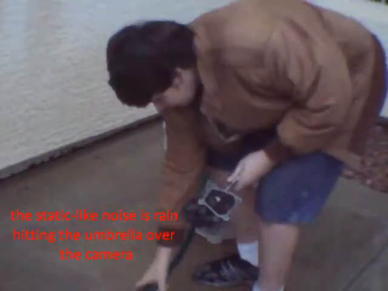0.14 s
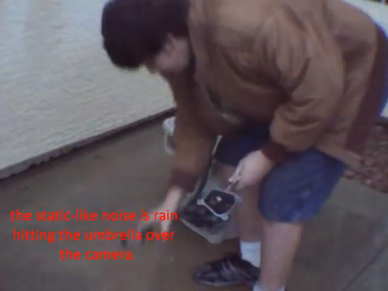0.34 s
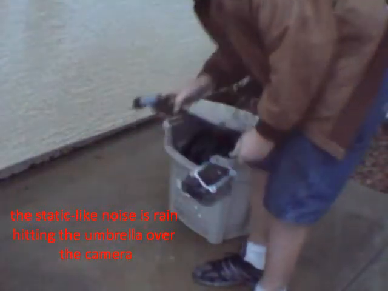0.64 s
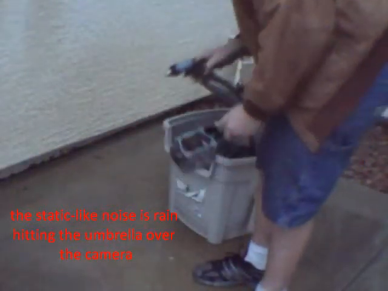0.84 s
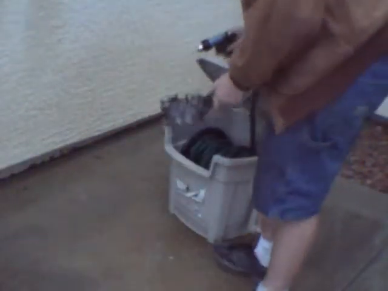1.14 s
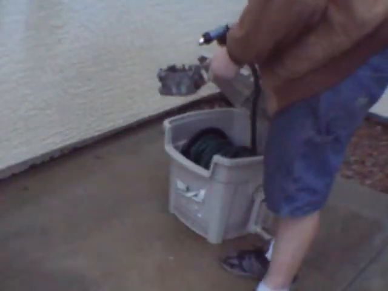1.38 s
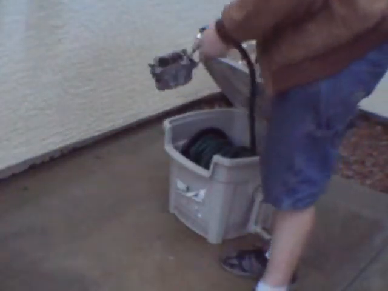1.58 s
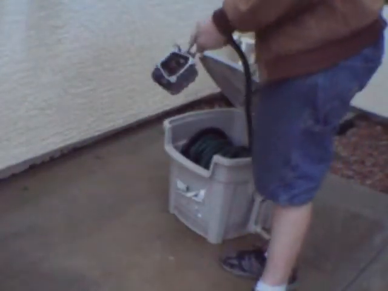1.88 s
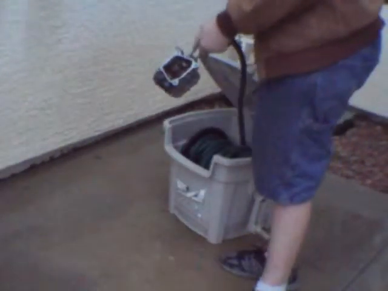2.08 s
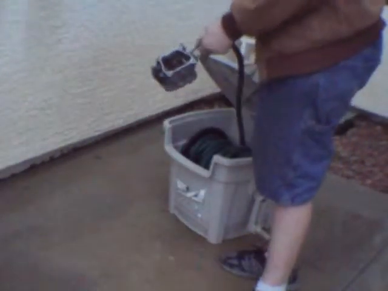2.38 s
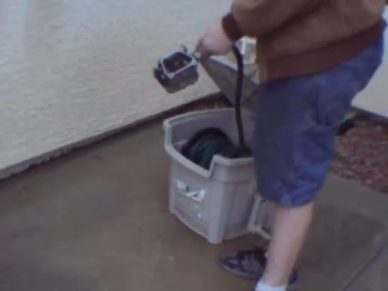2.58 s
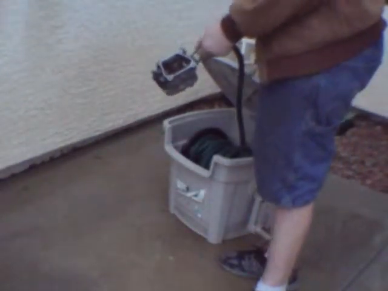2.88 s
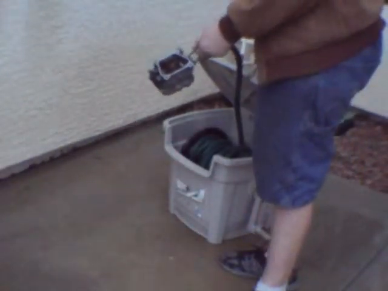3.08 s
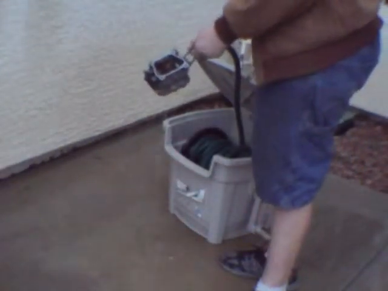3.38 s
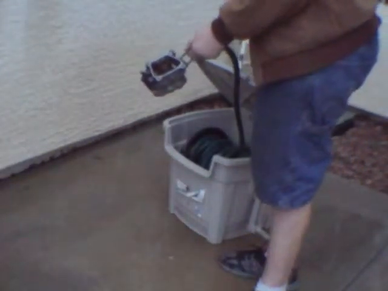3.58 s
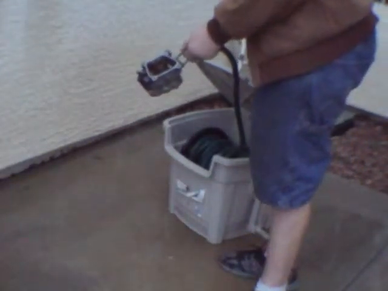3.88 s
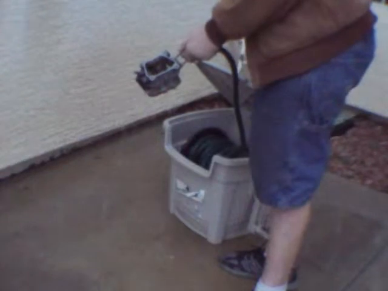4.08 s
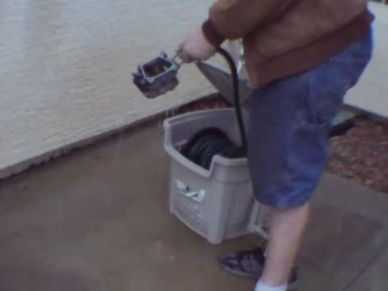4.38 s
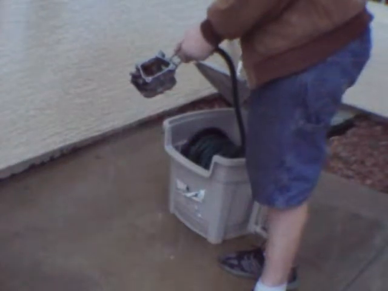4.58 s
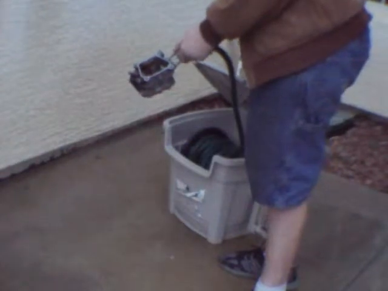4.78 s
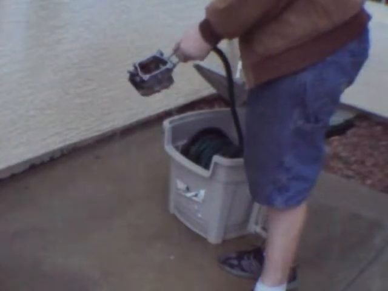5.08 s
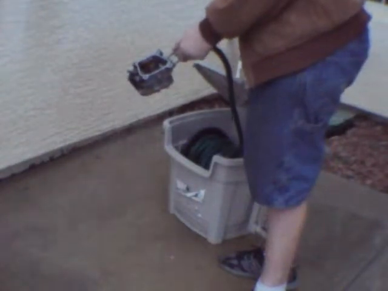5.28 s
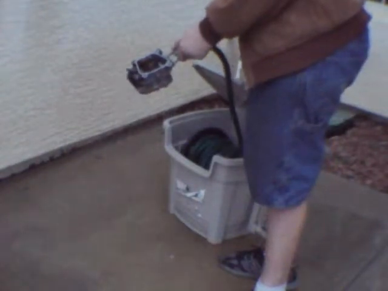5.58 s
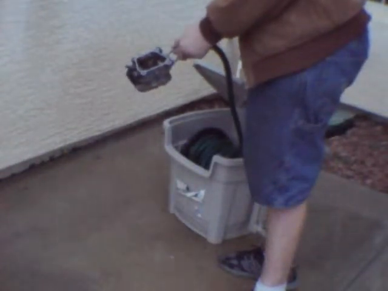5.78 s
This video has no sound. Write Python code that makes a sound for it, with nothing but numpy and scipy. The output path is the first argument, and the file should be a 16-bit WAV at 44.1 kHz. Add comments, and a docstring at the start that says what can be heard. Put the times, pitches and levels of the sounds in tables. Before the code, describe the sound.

Heavy rain drums rapidly on an umbrella right above the microphone, with brief plastic knocks and scraping early, then livelier water splashes.

```python
"""Heavy rain drums on a taut umbrella just above a small camera microphone: each drop rings damped cloth modes.
A hose fizzes and splashes as noise grains and bubbles; run-off from a rinsed metal part joins halfway.
Early on, things knock (struck modes) and scrape (banded grit) in a plastic hose bin; rain falls all around.
The cheap recorder whines faintly and sits far off zero, so its negative peaks clip."""
import sys
import numpy as np
from scipy import signal
from scipy.fft import rfft, irfft
from scipy.io import wavfile
from scipy.ndimage import uniform_filter1d

SR = 44100
rng = np.random.default_rng(int(sys.argv[2]) if len(sys.argv) > 2 else 0)


def int16_out(signal):
    """Quantize to a 16-bit WAV file."""
    q = np.round(np.clip(np.atleast_2d(signal).T, -1, 1) * 32767)
    wavfile.write(sys.argv[1], SR, q.astype(np.int16))


N = 261954


def undb(db):
    """Amplitude factor of a level in dB."""
    return 10 ** (np.asarray(db) / 20)


def level(x, rms_db):
    """Scale to an rms level."""
    return x * undb(rms_db) / np.sqrt(np.mean(x ** 2))


def decay(t, t60_s):
    """Exponential decay, 60 dB down at t60_s."""
    return np.exp(-np.log(1000) * t / t60_s)


def seconds(length_s):
    """Time axis of a grain."""
    return np.arange(int(length_s * SR)) / SR


def curve(table):
    """Amplitude over the scene from (time [s], level [dB])."""
    time_s, db = np.transpose(table)
    return undb(np.interp(np.arange(N) / SR, time_s, db))


def add(out, time_s, grains):
    """Mix one grain (row) in at each time."""
    at = (np.asarray(time_s) * SR).astype(int)[:, None] + np.arange(grains.shape[1])
    out += np.bincount(at.ravel(), grains.ravel(), N + SR)[:N]


def band(x, hz, width_hz):
    """Single resonance."""
    return signal.lfilter(*signal.iirpeak(hz, hz / width_hz, fs=SR), x)


def walk(rate_hz):
    """Random levels held 1 / rate_hz and slewed twice."""
    hold = int(SR / rate_hz)
    steps = np.repeat(rng.standard_normal(N // hold + 1), hold)
    return 1.08 * uniform_filter1d(uniform_filter1d(steps, hold), hold)[:N]


# steady tones: (frequency [Hz], rms level [dB])
WHINE_TONES = [(1000, -53), (7500, -63.5)]


def whine():
    """Two thin steady tones from the camera's electronics."""
    t = np.arange(N) / SR
    return sum(undb(db) * 2 ** .5 * np.sin(2 * np.pi * hz * t) for hz, db in WHINE_TONES)


# spectrum of the surrounding rain: (frequency [Hz], relative density [dB per Hz])
FAR_RAIN_SPECTRUM = [(25, -6.5), (60, -9), (130, -8), (300, -8), (600, -3.5), (1000, -2.5), (1300, -3),
                     (1860, -5.5), (2520, -11.5), (4000, -15), (7300, -20), (8400, -18)]
FAR_RAIN_RMS_DB = -40


def far_rain():
    """Rain on the ground around: bands half an octave apart swell together and flicker alone."""
    hz, db = np.transpose(FAR_RAIN_SPECTRUM)
    f = np.maximum(np.fft.rfftfreq(N, 1 / SR), 1)
    colour = undb(np.interp(np.log(f), np.log(hz), db))
    swell = walk(2)
    out = np.zeros(N)
    for centre_oct in np.arange(4.5, 13.6, .5):  # log2 of Hz
        share = np.clip(1 - 2 * np.abs(np.log2(f) - centre_oct), 0, 1) ** .5
        noise = irfft(rfft(rng.standard_normal(N)) * colour * share, N)
        out += undb(3.0 * swell + 0.84 * walk(25)) * noise
    return level(out, FAR_RAIN_RMS_DB)


# things dragged along the bin: (time [s], level [dB])
SCRAPE_LEVEL = [(.32, -58), (.35, -38), (.4, -36), (.46, -48), (.74, -48), (.8, -34), (.86, -40),
                (.95, -37.5), (1.05, -63)]


def scrape():
    """Uneven stick-slip grit, ringing the wall in a broad band."""
    time_s, db = np.transpose(SCRAPE_LEVEL)
    grit = rng.standard_normal(N) * undb(3.9 * walk(120))
    envelope = undb(np.interp(np.arange(N) / SR, time_s, db, -120, -120))
    return envelope * level(band(grit, 620, 700), 0)


# blows in the bin: (time [s], level [dB], pitch factor [1], nominal contact [s])
BIN_BLOWS = [(0.345, -30.5, 1.3, 0.0012), (0.356, -36, 1.02, .001), (0.374, -24, 0.69, 0.0028),
             (0.386, -41, 1.03, .001), (.405, -28.5, 0.85, 0.0022), (0.754, -28, 1.1, 0.0042),
             (0.793, -20.5, 1.02, 0.00092), (.801, -37, 1.14, 0.0007), (.808, -26, 1.04, 0.0013),
             (.814, -21.5, 1.014, 0.00068), (0.83, -33.5, 0.9, 0.00051), (0.846, -30, 0.81, .004),
             (.88, -29.5, 0.97, 0.0022), (.92, -37, 1.07, 0.00083)]
# wall modes before the pitch factor: (frequency [Hz], t60 [s], level [dB])
BIN_MODES = [(239, 0.12, -1.5), (356, 0.048, -6), (525, 0.06, -7), (676, 0.054, -14), (835, 0.05, -5),
             (986, 0.042, -2.5), (1306, 0.046, -2)]


def bin_knocks():
    """Blows on the plastic wall: a longer push leaves the upper modes quiet; loose parts rattle after."""
    out, t = np.zeros(N), seconds(.25)
    for time_s, db, pitch, contact_s in BIN_BLOWS:
        ring = sum(undb(mode_db) * np.sin(2 * np.pi * hz * pitch * t) * decay(t, t60_s)
                   for hz, t60_s, mode_db in BIN_MODES)
        rattle = 3.1 * band(rng.standard_normal(len(t)), 800, 1300) * decay(t, 0.11)
        push = t * np.exp(-t / max(contact_s / 8, 1 / SR))
        blow = signal.fftconvolve(ring + rattle, push / push.sum())[None, :len(t)]
        add(out, [time_s], -undb(db) * blow)
    # the blows carry little below about 140 Hz
    return signal.sosfilt(signal.butter(2, 140, "high", fs=SR, output="sos"), out)


# ringing bubbles, and one short click at the very start:
# (time [s], level [dB], first pitch [Hz], last pitch [Hz], t60 [s])
PLINK_GLIDES = [(3.159, -34, 2900, 3020, .08), (3.1946, -13, 3600, 3750, 0.0085),
                (3.1946, -11.5, 1900, 2880, 0.012), (2.9, -28.5, 2700, 3100, .04),
                (4.3766, -8.5, 2660, 3800, 0.01), (4.3764, -18, 1900, 1800, .02),
                (4.7529, -18, 3200, 3500, .012), (4.7863, -17, 2860, 3340, 0.015),
                (5.143, -22, 2000, 4040, 0.031), (.0053, -15.5, 2400, 2000, 0.011)]


def plinks():
    """Ringing bubbles and an opening click: decaying tones gliding quickly from first pitch to last."""
    out, t = np.zeros(N), seconds(.05)
    time_s, db, first_hz, last_hz, t60_s = np.transpose(PLINK_GLIDES)[:, :, None]
    hz = last_hz + (first_hz - last_hz) * np.exp(-t / 0.001)
    fade = (1 - np.exp(-t / 0.000067)) * decay(t, t60_s)
    add(out, time_s[:, 0], undb(db) * fade * np.sin(2 * np.pi * np.cumsum(hz, axis=1) / SR))
    return out


# water bands; splashes use all but the first: (centre [Hz], width [Hz], level [dB])
WATER_BANDS = [(1670, 1200, -1), (3256, 800, -2), (5600, 1980, -1), (8040, 1800, -6.5)]


def splash(time_s, db, hz, length_s):
    """A small rising bubble wrapped in spatter: part around the same pitch, part ringing the rinsed metal."""
    out, broad = np.zeros(N), np.zeros(N)
    t = seconds(min(.032, 4 * length_s.max()))
    onset = 1 - np.exp(-t / 0.00038)
    fade = undb(db)[:, None] * onset * np.exp(-.7 * (t / np.clip(length_s, .001, .03)[:, None]) ** 1.8)
    cycles = np.clip(hz, 500, 7800)[:, None] * t
    bubble = np.sin(2 * np.pi * cycles * (.85 + 30 * t)) * np.exp(-t / 0.0018)
    noise = rng.standard_normal((2, len(time_s), len(t)))
    flutter = uniform_filter1d(noise, size=30, axis=2) * 30 ** .5
    spatter = flutter[0] * np.cos(2 * np.pi * cycles) + flutter[1] * np.sin(2 * np.pi * cycles)
    add(out, time_s, fade * (0.2 * bubble + 0.59 * spatter))
    add(broad, time_s, fade * rng.standard_normal(fade.shape))
    metal = sum(undb(g) * band(broad, centre_hz, width_hz) for centre_hz, width_hz, g in WATER_BANDS[1:])
    return out + undb(3.0) * metal


# loudest splashes off the hose and the rinsed part: (time [s], level [dB], pitch [Hz], length [s])
BIG_SPLASHES = [(.0053, -19, 6200, .0025), (0.01, -26, 4840, .003), (0.014, -26, 5000, 0.0044),
                (.022, -31.5, 5000, 0.02), (.604, -27, 3180, .0047), (3.06, -33.5, 3600, .013),
                (3.1715, -29, 5880, .004), (3.1945, -25, 5760, .0022), (3.197, -28, 2400, .012),
                (3.2175, -28, 3060, 0.0054), (3.226, -29, 6000, .0047), (3.252, -31, 5700, 0.0041),
                (3.3323, -34, 2920, .03), (3.3779, -26, 5900, .0037), (3.609, -28, 6100, .0042),
                (3.652, -20, 3180, 0.0027), (3.678, -26.5, 3700, .0041), (3.8075, -29.5, 3500, .0055),
                (3.8303, -26.5, 3370, .0048), (3.983, -30.5, 5570, 0.0058), (4.1435, -25, 5930, 0.0052),
                (4.1535, -29.5, 3040, .0092), (4.1778, -27, 6050, .0041), (4.2055, -19.5, 6140, 0.0027),
                (4.254, -29.5, 6030, .0061), (4.375, -27, 3400, 0.013), (4.3865, -25, 3300, .004),
                (4.395, -27, 3030, 0.0077), (4.405, -31.5, 3490, .021), (4.54, -28, 5970, 0.0057),
                (4.572, -25, 3640, 0.0052), (4.643, -27.5, 3800, .008), (4.672, -27.5, 3450, .0095),
                (4.702, -23, 6150, .0045), (4.717, -23, 3000, .0045), (4.7296, -28, 5600, .007),
                (4.7532, -26, 3380, .0019), (4.775, -27.5, 6230, .0082), (4.7875, -26, 3170, 0.021),
                (4.829, -27.5, 3920, 0.0057), (5.102, -34, 3890, .018), (5.125, -25.5, 6150, .0066),
                (5.141, -24.5, 5880, .0057), (5.147, -31.5, 5630, .028), (5.2001, -30, 5800, .0077),
                (5.2116, -15.5, 6120, .0039), (5.2233, -29, 5570, 0.016), (5.2536, -32, 3400, 0.015),
                (5.3747, -28, 3410, .0045), (5.389, -28, 6000, .0042), (5.447, -26, 2890, 0.0068),
                (5.4862, -29, 6000, .0037), (5.5673, -26, 5530, .0045), (5.668, -29, 5600, .0042),
                (5.678, -24, 5400, .0022), (5.751, -27.5, 3370, 0.0079), (5.8244, -25, 5980, 0.0058),
                (5.887, -27, 5800, .008)]
# course of the spray: (time [s], relative level [dB])
SPRAY_LEVEL = [(0.0, -41.5), (2.79, -40.5), (3.32, -38), (3.57, -39), (3.7, -37.5), (4.09, -39),
               (4.52, -38), (4.65, -35), (4.96, -37.5), (5.33, -35), (5.69, -37.5), (5.94, -38.5)]
RINSE_FROM_S, RUNOFF_MEAN_DB, RUNOFF_MEDIAN_S = 3.05, -35.5, .009


def hose(small_count=1500, runoff_count=45):
    """Big splashes, scattered run-off, many small ones and a flickering fizz, the last two following the spray."""
    time_s, db = np.transpose(SPRAY_LEVEL)
    chance = rng.random((small_count, 4)).T
    small_s = chance[0] * N / SR
    small_db = np.interp(small_s, time_s, db) - 4.5 - 3.0 * np.log(1 - .95 * chance[1])
    small = splash(small_s, small_db, 2600 * 2.9 ** chance[2], 0.00099 + 0.0023 * chance[3])

    # gulps of water run off the part once rinsing begins
    luck = rng.standard_normal((runoff_count, 4)).T
    runoff_s = rng.uniform(RINSE_FROM_S, N / SR, runoff_count)
    runoff_hz = np.where(luck[0] > .25, 5900, 3250) * np.exp(.07 * luck[1])
    runoff_length_s = RUNOFF_MEDIAN_S * np.exp(0.42 * luck[3])
    runoff = splash(runoff_s, RUNOFF_MEAN_DB + 2.2 * luck[2], runoff_hz, runoff_length_s)

    fizz = np.zeros(N)
    for hz, width_hz, band_db in WATER_BANDS:
        hiss = level(band(rng.standard_normal(N), hz, width_hz), 0)
        fizz += undb(band_db + 1.75 * walk(40)) * hiss
    big = splash(*np.transpose(BIG_SPLASHES))
    return big + runoff + small + curve(SPRAY_LEVEL) * level(fizz, -2.56)


# cloth panel, low to high: (frequency [Hz], t60 [s], level [dB], relative pitch spread [1]);
# pitch and t60 are nominal, scattered per drop
CLOTH_MODES = [(232, 0.0072, -18, 0.28), (675, 0.0088, -5, 0.17), (982, 0.005, 5, .09),
               (1762, 0.0047, 7.5, 0.073), (3570, 0.0019, 4, 0.069)]


def cloth(time_s, db, low_db, snap_db, scatter_db, detune):
    """Each drop swings all modes out on a pressure crest, tuned by where it lands; a shiver follows."""
    out, shiver = np.zeros(N), np.zeros(N)
    t = seconds(0.015).astype(np.float32)
    chance = rng.standard_normal((len(time_s), 3 * len(CLOTH_MODES)), dtype=np.float32)
    mode_colours_db = (low_db, low_db, low_db, 0 * db, snap_db)
    grains = 0
    for k, (hz, t60_s, mode_db, spread) in enumerate(CLOTH_MODES):
        pitch, ring, size = chance[:, 3 * k:3 * k + 3].T[:, :, None]
        gain = undb(db[:, None] + mode_colours_db[k][:, None] + mode_db + scatter_db * size)
        fade = (1 - 0.25 * np.exp(-t / 0.00027)) * decay(t, t60_s * np.exp(0.28 * ring))
        mode_hz = hz * np.exp(detune * spread * pitch)
        grains = grains + gain * fade * np.cos(2 * np.pi * mode_hz * t + 0.55)
    add(out, time_s, grains)
    tail = (1 - np.exp(-t / 0.00068)) * decay(t, 0.049)
    add(shiver, time_s, undb(db)[:, None] * tail * rng.standard_normal(grains.shape))
    return out + undb(-8.5) * (band(shiver, 1100, 860) + undb(5.5) * band(shiver, 1900, 800))


# loudest drops: (time [s], relative level [dB], three low modes above it [dB])
LOUD_DROPS = [(.018, -19, -4), (.069, -21, -4), (.1379, -31.5, 7), (.1494, -24, -10), (.171, -26, -3),
              (0.1925, -26.5, -1.5), (0.1987, -19.5, -4), (.2277, -21, 4.5), (.2405, -22, -4),
              (.2434, -19.5, -5), (0.289, -29, 3), (.2998, -24, -4), (.3705, -25.5, 1.5), (.4162, -23.5, 0),
              (0.4227, -22, 0), (.4326, -25, -7), (0.4763, -18.5, -5), (.5022, -23, -3), (.567, -19, -9.5),
              (0.5845, -24, 1), (.625, -23, -9), (0.6414, -14.5, -1.5), (.6686, -17, -8), (.6926, -26, 0),
              (.7285, -22.5, -8), (0.9867, -24, -3), (1.011, -24, -11), (1.0193, -21, -13),
              (1.042, -28.5, 7.5), (1.078, -27, 3), (1.0923, -20.5, -4), (1.1638, -26, -11),
              (1.2691, -24, 2.5), (1.3053, -25, -9), (1.3317, -25.5, 0), (1.3354, -19.5, -9),
              (1.3492, -21, 0), (1.3635, -25, -1), (1.413, -22, -9), (1.4302, -28, 1), (1.4422, -26, -4),
              (1.448, -30, 1), (1.493, -24.5, -6), (1.5304, -24.5, 5), (1.5465, -11, -11),
              (1.5581, -20, -13), (1.5664, -23, -11), (1.6557, -30.5, 1), (1.6788, -30, 2),
              (1.7875, -23.5, -1), (1.8191, -29, 5.5), (1.8808, -19, -2), (1.8882, -20.5, -2),
              (1.9243, -16, -2.5), (1.971, -24, -7), (2.007, -23, 1), (2.0192, -18, -2), (2.1819, -26, 1.5),
              (2.2205, -27, 1), (2.226, -14.5, -1.5), (2.235, -24, 2), (2.2881, -20.5, -3),
              (2.2437, -29, -8), (2.248, -29, 3), (2.2842, -29, -2), (2.3453, -20.5, -1.5),
              (2.378, -15, -4), (2.4588, -27, 1), (2.4936, -23.5, -9), (2.5235, -21, -19),
              (2.535, -17.5, -9), (2.5622, -22, -6), (2.6785, -19.5, -2), (2.766, -27, 3),
              (2.8682, -26.5, 2.5), (2.8832, -20, -9), (2.9591, -21, -13), (2.972, -18.5, -5),
              (2.993, -23, -6), (3.0825, -20, -8), (3.1043, -24, 1.5), (3.166, -24, -4), (3.204, -28, -10),
              (3.214, -22, -5), (3.286, -20, -7), (3.3086, -27, 1), (3.3284, -18, -5), (3.3368, -24, -14),
              (3.458, -19, -1), (3.481, -17.5, -1), (3.4968, -20.5, -12), (3.5317, -27, -10),
              (3.5691, -24.5, -12), (3.5936, -24.5, -3), (3.6678, -22.5, 1.5), (3.81, -15, -1.5),
              (3.859, -27.5, -1), (3.874, -20, -1), (3.89, -22, -6), (3.9026, -24.5, 0), (3.9087, -18, -6),
              (3.916, -24, -1.5), (3.9698, -25.5, 0), (4.1418, -27.5, -5), (4.1644, -24, -3),
              (4.2553, -23.5, -10), (4.2828, -20, -2), (4.3706, -24, -6), (4.3947, -24, -2),
              (4.415, -28, -12), (4.4786, -20, -2.5), (4.527, -22.5, -6), (4.536, -26, 1),
              (4.556, -28, 5.5), (4.5742, -24, -8), (4.6055, -26, 3.5), (4.7024, -19.5, 0),
              (4.711, -20.5, 1), (4.7215, -23, -10), (4.7426, -27, 2), (4.837, -28.5, 1.5),
              (4.8808, -25, -9), (4.8982, -23.5, -5), (4.9084, -28, 5), (4.952, -17.5, -3.5),
              (4.9602, -23, -4), (4.9778, -21, -11), (4.99, -25, -3), (5.0107, -27, -11),
              (5.0329, -15.5, -12), (5.0454, -21.5, 2), (5.0637, -24, -12), (5.082, -24, -4),
              (5.1011, -20.5, -2), (5.1168, -22, -10), (5.1786, -26.5, -4), (5.1893, -24, -7),
              (5.2283, -27, 3), (5.2643, -19, -3.5), (5.354, -24, -7), (5.3756, -16, -8),
              (5.4037, -20.5, -5), (5.4151, -16, 0.5), (5.4204, -18, -4), (5.424, -22, -8),
              (5.436, -22, -4), (5.449, -25, -12), (5.458, -23, -8), (5.5411, -33, 6), (5.5794, -24.5, 5),
              (5.6118, -25, -5), (5.6198, -22.5, -1), (5.6225, -22, -8), (5.6643, -22, -6),
              (5.7406, -23.5, -3), (5.7972, -17.5, -13), (5.808, -20.5, 1), (5.8468, -23.5, 2),
              (5.861, -17, -17), (5.8908, -19.5, -12)]
# medium and small drops: (time [s], level against their mean [dB])
PATTER_LEVEL = [(0, 0.28), (.7, -0.011), (1.4, -0.95), (2.1, -1.5), (2.8, -0.26), (3.5, -0.063),
                (4.2, 0.11), (4.9, 0.97), (5.4, 1.5), (5.94, .5)]
DROP_GAIN_DB = 3.5  # gain of loud and medium drops over their listed levels
SNAP_DB, SNAP_SPREAD_DB = -11.5, 3.5  # top mode against the drop level, and its scatter
REBOUND_S, REBOUND_DB = .009, -9  # nominal delay and level of a droplet thrown up
MEDIUM_DB, MEDIUM_SPREAD_DB = -31, 2.5
ECHO_DB = -15


def rain(small_count=4200, medium_count=200):
    """Loud drops with rebounds, medium ones and a dense patter, softened as water spreads on contact."""
    time_s, db, low_db = np.transpose(LOUD_DROPS)
    luck = np.clip(rng.standard_normal((len(time_s), 4)).T, -3, 1.5)
    snap_db = SNAP_DB + SNAP_SPREAD_DB * luck[0]
    loud = cloth(time_s, db + DROP_GAIN_DB, low_db, snap_db, scatter_db=1.27, detune=0.57)
    rebound_s = time_s + REBOUND_S * np.exp(.5 * luck[1])
    rebound_db = db + REBOUND_DB + 3.0 * luck[2]
    rebound = cloth(rebound_s, rebound_db, -3 + 5 * luck[3], snap_db, scatter_db=2.5, detune=.9)

    luck = np.clip(rng.standard_normal((medium_count, 3)).T, -3, 1.2)
    medium_s = rng.random(medium_count) * N / SR
    medium_db = MEDIUM_DB + DROP_GAIN_DB + MEDIUM_SPREAD_DB * luck[0]
    medium = cloth(medium_s, medium_db, -1.5 + 5 * luck[1], SNAP_DB + SNAP_SPREAD_DB * luck[2],
                   scatter_db=2.0, detune=0.93)

    chance = rng.random((small_count, 4)).T
    small_db = -44 - 4.0 * np.log(1 - .95 * chance[1])
    small = cloth(chance[0] * N / SR, small_db, -3 + 8 * (chance[2] - .5), -8 + 8 * (chance[3] - .5),
                  scatter_db=4.0, detune=1.54)
    patter = curve(PATTER_LEVEL) * (medium + small)

    def contact(at_s):
        """Smooth push of a spreading drop."""
        return np.exp(-.5 * ((seconds(.003) - at_s) / .00006) ** 2)

    # the sound returns once more between camera and canopy
    response = contact(0.00023) + undb(ECHO_DB) * contact(0.001222)
    return signal.fftconvolve(loud + rebound + patter, response / response.sum())[:N]


def scene():
    """All sources, background first, as one channel."""
    return (whine() + far_rain() + scrape() + bin_knocks() + plinks() + hose() + rain())[None]


OFFSET, RAIL, SECOND_RAIL = -.3455, -.499, -.497  # of full scale
TOP_HZ, LAST_HZ = 8500, 15800  # stopband edge of the first low-pass, passband edge of the last


def record(dry):
    """The offset pushes troughs into the rail; after the band limit the overshoot is squeezed at a second rail."""
    clipped = np.maximum(dry, RAIL - OFFSET)
    narrow = signal.sosfilt(signal.cheby2(16, 65, TOP_HZ, fs=SR, output="sos"), clipped)
    squeezed = narrow + .35 * np.maximum(SECOND_RAIL - OFFSET - narrow, 0)
    return OFFSET + signal.sosfilt(signal.ellip(10, .2, 60, LAST_HZ, fs=SR, output="sos"), squeezed)


dry = scene()
out = record(dry)
int16_out(out)
```